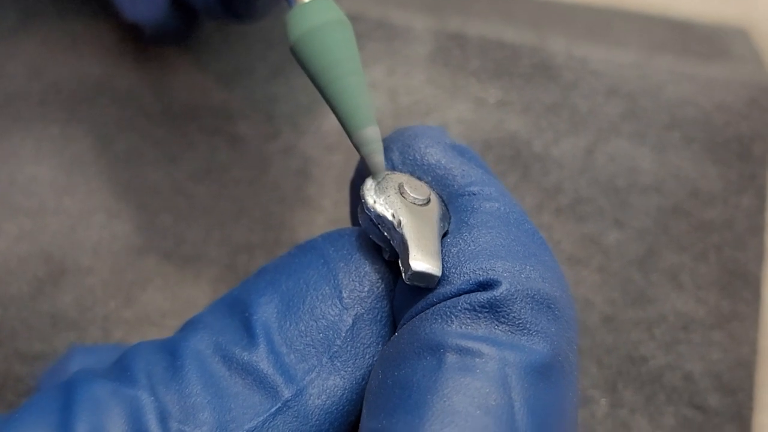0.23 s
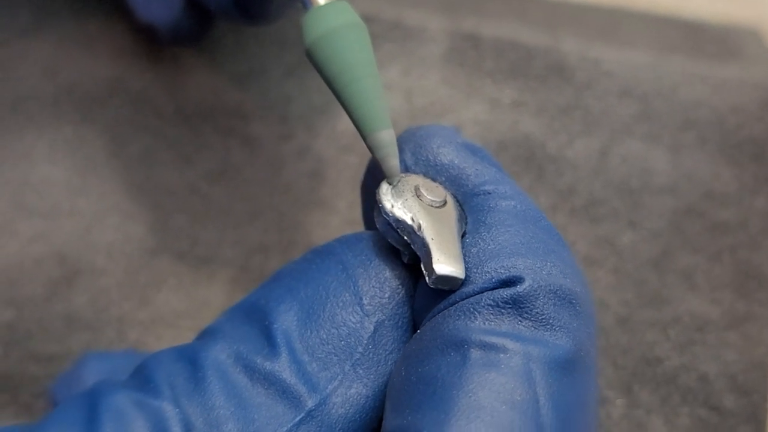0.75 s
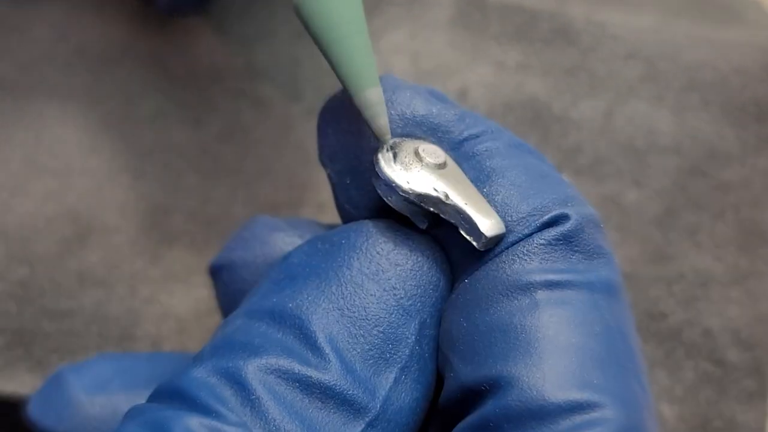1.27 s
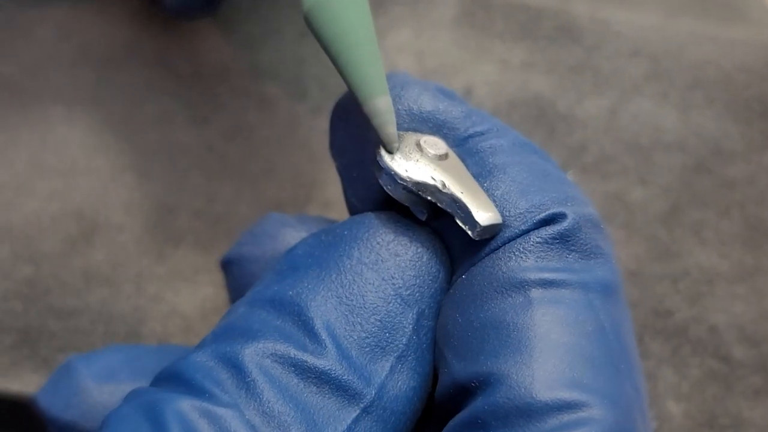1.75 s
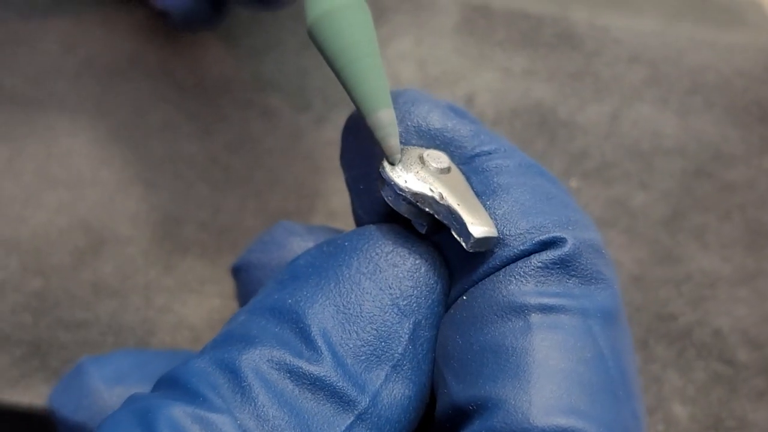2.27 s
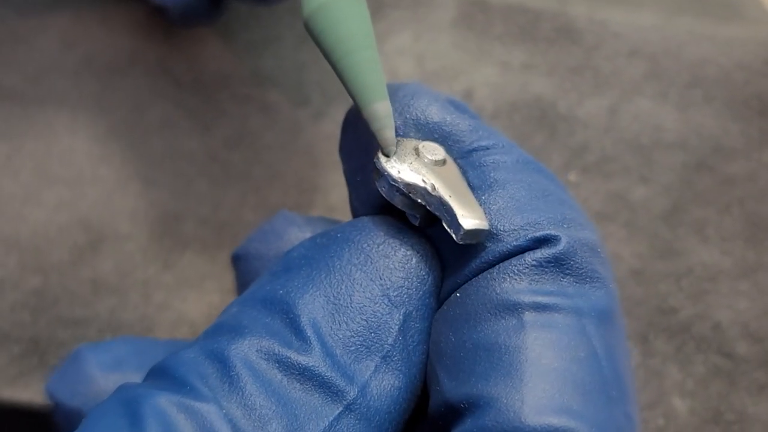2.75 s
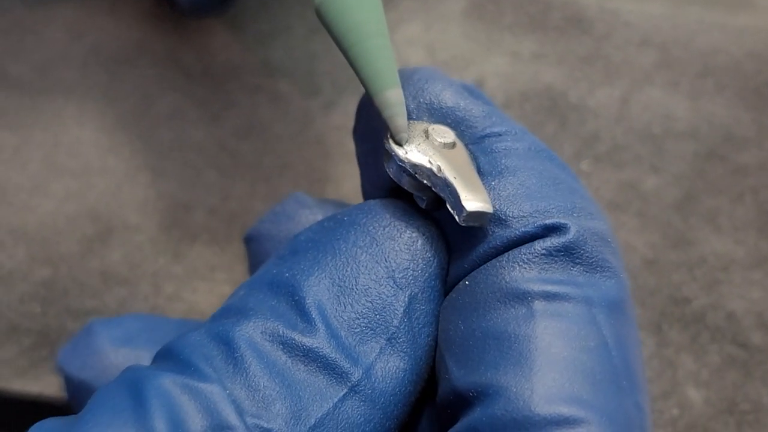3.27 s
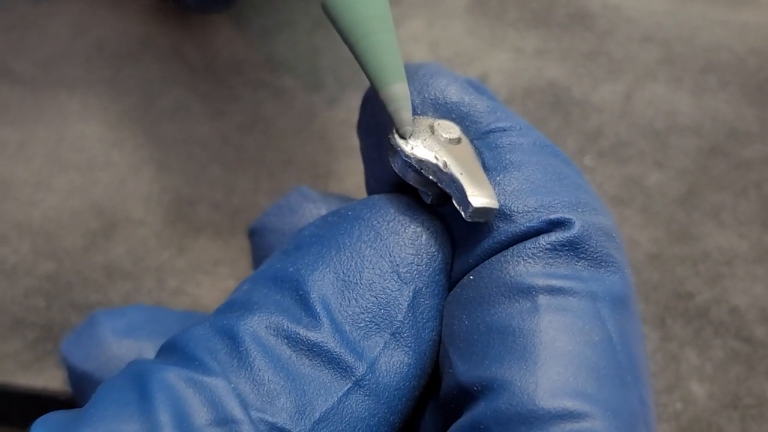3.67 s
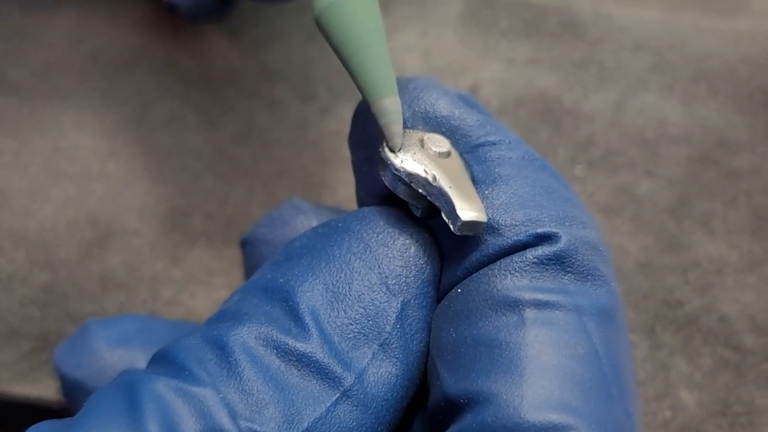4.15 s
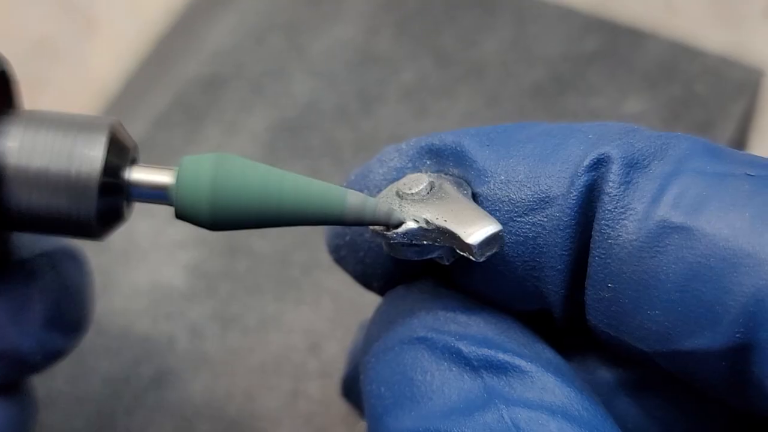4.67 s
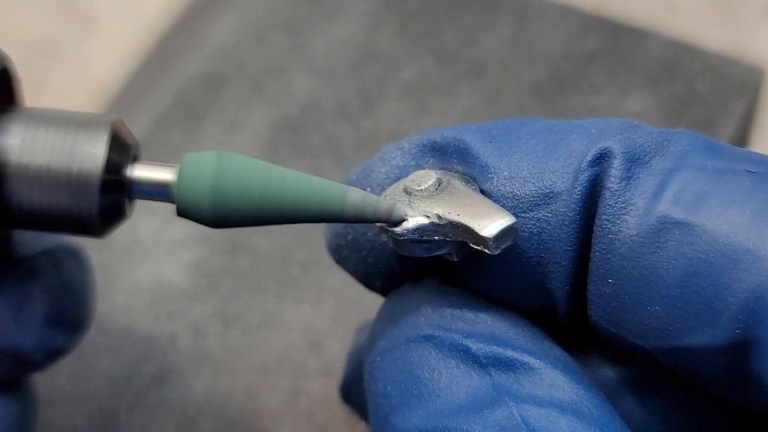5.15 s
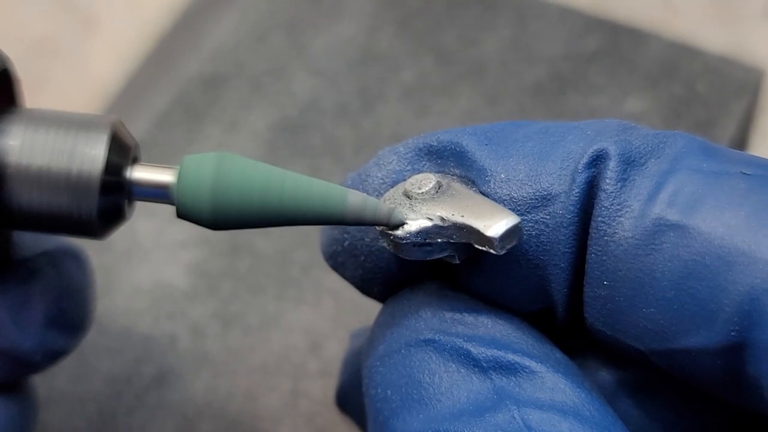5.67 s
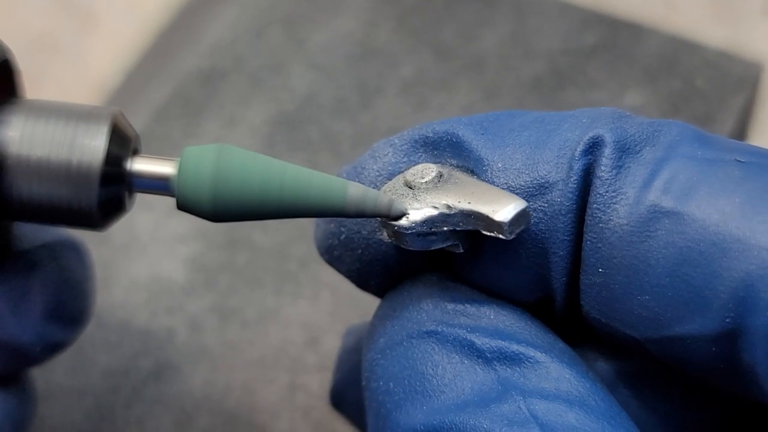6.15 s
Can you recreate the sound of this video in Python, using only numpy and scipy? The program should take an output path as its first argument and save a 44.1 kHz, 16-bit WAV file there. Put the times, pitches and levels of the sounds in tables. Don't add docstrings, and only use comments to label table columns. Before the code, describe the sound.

Close, dry stereo sound of a miniature grinder polishing metal. A rapid rattle forms a bright, nasal, buzzing whine with gritty hiss. After a second the scene jumps to firmer pressure, ringing strongly and slowing under load while its metallic tone slides. Near the end it jumps again to even, slightly wavering grinding. A faint squeal persists and the motor never stops.

```python
import sys
import numpy as np
from scipy import signal
from scipy.fft import rfft, irfft
from scipy.io import wavfile
from scipy.ndimage import uniform_filter1d, map_coordinates

SR = 44100
rng = np.random.default_rng(int(sys.argv[2]) if len(sys.argv) > 2 else 0)


def boost_factor(decibels):
    exponent = np.asarray(decibels, float) / 20
    return 10 ** exponent


def materialize(psi):
    bounded = np.clip(np.atleast_2d(psi).T, -1, 1)
    quanta = np.round(bounded * 32767).astype(np.int16)
    wavfile.write(sys.argv[1], SR, quanta)


N = 283122
ORDERS = 122
STFT = dict(fs=SR, nperseg=1024, noverlap=768)

CUTS_S = [
    1.11,
    4.635,
]
# (frequency [Hz], level [dB])
ROOM_COLOUR = [(20, -16), (100, -12), (160, -12), (200, -2), (400, -4), (500, -12), (900, -30)]
ROOM_DB = -69
# (time [s], frequency [Hz], left [dB], right [dB], left lead [rad])
SQUEAL = [
    (0, 4398, -54, -55, 1.1),
    (1.1, 4399, -54, -57, 1),
    (1.2, 4412, -66, -70, 1.5),
    (1.8, 4418, -54, -60, 1.7),
    (3.7, 4388, -52, -60, 1.8),
    (4.25, 4357, -53, -59, 2),
    (4.6, 4352, -55, -60, 2),
    (4.7, 4358, -52.5, -49.5, 4.2),
    (6.42, 4357, -52.5, -49.5, 4.3),
]
SIDEBANDS_DB = [-3, -5, -4]
# (frequency [Hz], first pass [dB], second [dB], third [dB])
GRIT_COLOUR = [(70, -40, -40, -45), (130, -21, -21, -25), (350, -16, -16, -20), (700, -16, -13, -16),
               (1200, -18, -21, -16), (2000, -17, -21.5, -11), (3500, -14, -16, -13), (7500, -15, -17, -12),
               (9500, -15, -18, -14), (15600, -12, -12, -14)]
# (time [s], speed [turns/s])
SHAFT_SPEED = [
    [(0.0, 143.5), (0.246, 145.2), (0.448, 145.9), (0.946, 146.1), (1.11, 143)],
    [(1.11, 163), (1.37, 164.2), (1.88, 155.2), (2.34, 150.4), (2.82, 148.9), (2.95, 146.8), (3.52, 144.9),
     (3.88, 137.4), (4.25, 132.1), (4.63, 128.5)],
    [(4.635, 132.7), (4.8, 130.5), (5.0, 132.2), (5.38, 134.6), (5.55, 132.7), (5.83, 131.1), (6.0, 132.4),
     (6.25, 131.4), (6.42, 132.2)],
]
# (time [s], pressure [dB], part tilt [dB])
HANDS = [
    [(0.0, -1, -2.5), (0.28, -0.5, 3.5), (0.56, 1.5, 2), (0.83, -0.5, 4), (1.11, -3.5, -3)],
    [(1.11, 2, 21), (1.4, 6.5, 15.5), (1.6, 3.5, 6), (1.85, 5, -4), (2.5, 2, 4), (2.8, 2, 9),
     (3.4, -0.5, 13), (3.95, -3, -2), (4.63, -2, 0.5)],
    [(4.63, 0.5, -4), (5.2, -1, -4), (5.8, -1.1, -5.5), (6.42, -2, -10)],
]
PARTS_HZ = [700, 1300, 2500, 2900, 5000, 6000, 10200, 10800, 16000]
FOLLOWS_PRESSURE = (1, 0.14, 0.2, 0.24)
FOLLOWS_TILT = (-0.16, 0.28, -0.072, -0.062)
# (frequency [Hz], left [dB], right [dB])
ORDER_COLOUR = [
    [(132, -75, -87), (356, -63, -74), (890, -57.5, -61.5), (1710, -45.5, -43.5), (2540, -53.5, -67),
     (4250, -60, -66), (5290, -105, -105), (5740, -63, -89), (6530, -58, -52), (8150, -53, -53),
     (11650, -63.5, -63.5), (15600, -53, -63)],
    [(126, -65.5, -74), (342, -64, -66), (790, -58.5, -68), (1545, -36.5, -36), (2310, -48.5, -60.5),
     (4308, -62, -67.5), (5670, -100, -101), (5730, -72, -88.5), (7126, -64, -46.5), (8590, -48.5, -49.5),
     (12200, -57.5, -68.5), (15600, -53.5, -68)],
    [(127, -63.5, -73), (320, -54.5, -63), (800, -60, -62.5), (1570, -59.5, -64), (2280, -50.5, -52.5),
     (4550, -52, -54), (5930, -63.5, -80), (5540, -57, -46), (6800, -61.5, -71), (9000, -57.5, -73),
     (12300, -57, -66.5), (15600, -61, -66)],
]
# (frequency [Hz], left lead [rad])
PORT_LEAD = [
    [(0, 0.5), (1450, 3.1), (3100, 4.4), (7400, 11.0), (8300, 14.0), (9000, 12.8), (9700, 15.3),
     (15500, 24.0)],
    [(0, 1.55), (3700, 5.3), (4500, 8.2), (8100, 14.4), (9300, 12.7), (9700, 15.6), (12700, 16.9),
     (16000, 24.0)],
    [(0, -0.4), (910, 2.3), (2110, -2.7), (4230, 3.8), (7550, 15.0), (9660, 8.7), (13280, 9.0),
     (15090, 17.7)],
]
STEADINESS = [
    (.25, .45, .6, .3, 0),
    (.12, .35, .34, .3, .25),
    (.25, .3, .5, .38, .5),
]
# [dB], [rad]
SCATTER_DB = [1.8, 1.5, 1.8]
SCATTER_RAD = [1.0, .3, .9]
UNSTEADY_RISE = [.3, .15, .55]
# (time [s], tip chatter [Hz], bearing whine [Hz], gap [Hz], gap level
# [dB])
GRIP = [
    (1.12, 1840, 9000, 10900, 4),
    (1.45, 2080, 8660, 10700, -2),
    (1.85, 2320, 8770, 10000, -3),
    (2.1, 1860, 9360, 10000, 0),
    (2.45, 2000, 9060, 10100, -9),
    (2.9, 2270, 9000, 9940, -6),
    (3.55, 2610, 9370, 9700, -12),
    (4.0, 1860, 9260, 9940, -12),
    (4.63, 1760, 9000, 10250, -10),
]
# (order [-], left [dB], right [dB], left lead [rad])
ODD_FIRST = [(4, 1, 3, -0.6), (7, -7, -6, -1.8), (9, -9, 0, -0.9), (11, -5, -5, 0.1), (12, -10, -6, 0.1),
             (13, 1, 5, 0.3), (14, -11, -8, 2.0), (15, 4, -3, -1.8), (16, 5, 1, -1.4), (18, 0, 7, 0),
             (19, -10, -9, 2.6), (22, -4, -9, 1.2), (23, 4, 4, 0.6), (24, 2, 2, -0.8), (25, 4, 8, 0.5),
             (27, 4, 7, 0.8), (28, -3, -2, 2.3), (56, 7, 0, -0.3), (30, -8, -8, 0), (64, 11, 10, 0.2),
             (67, 9, 11, 0.4), (88, 8, 6, -0.3), (95, 5, 1, -0.9), (105, 6, 3, -2.5), (98, -3, -4, 3),
             (108, 7, 10, 0)]
ODD_MIDDLE = [(1, -7, -7, 0), (2, -2, -2, 0), (4, 3, 3, .1), (5, -7, -3, -2.6), (6, 5, 5, .1),
              (7, 3, 3, .1), (8, 7, 4, 0.4), (9, 1, 2, -0.3), (14, -5, -3, -0.3), (15, 4, 3, -0.2),
              (16, -4, -5, -0.6), (17, -9, -6, -1.3), (18, -5, -2, 1.3), (19, -8, -7, -0.4),
              (26, -4, -4, -0.1)]
ODD_LAST = [(2, -10, -10, .1), (3, -9, -9, .1), (5, -13, -14, -0.2), (6, 8, 7, -0.5), (8, -10, -12, 0.8),
            (10, -3, -6, -1.4), (11, 5, 6, 2.3), (12, -4, -6, -1.2), (13, 8, 4, 1.4), (14, -5, -4, 1.5),
            (15, 5, 6, -0.4), (18, -5, -5, 0), (19, -6, -8, 0.3), (21, 4, 4, 0.5), (26, -7, -7, 1.0),
            (27, 6, 3, -0.4), (29, -8, -18, 0), (30, -9, -9, 0), (31, 4, 2, 0), (33, -16, -16, 0),
            (34, -3, -4, 0), (52, 4, 5, -0.1), (74, 7, 5, -0.4), (77, 4, 7, -0.3), (79, 6, 2, 1.2),
            (96, 6, 2, -1.0), (114, 6, 6, 0)]
# (centre [Hz], width [Hz], left [dB], right [dB])
BODY_FIRST = [(910, 210, -5.5, -6), (3070, 210, -4, 10.5), (3490, 270, 8.5, 4), (4550, 190, 11, -7),
              (6490, 310, -46, -13), (7560, 340, -8.5, -15), (8460, 900, -4.5, -28), (10010, 120, 6, 13),
              (10810, 180, 4, 9), (12600, 470, 1, -27), (13150, 130, 0, -7), (13240, 370, -8, -5),
              (9427, 53, -4, 17)]
BODY_MIDDLE = [(897, 30, -9, -31), (1170, 128, -33.5, -13.5), (1547, 185, -12, -9.5),
               (3120, 228, -8.5, 4.5), (3342, 73, 12, -42), (3596, 33.6, 10.5, 21.5),
               (5000, 426, 16.5, 12.5), (7426, 510, -8.5, -13.5), (8250, 580, -3.5, -47),
               (8930, 440, -9.5, -8), (9650, 290, -17, 1.5), (13240, 1050, -9, 4.5)]
BODY_LAST = [(3134, 380, -10.5, -18), (4840, 1130, -10, 1), (5290, 190, -47, -18), (7050, 58, 3, 17),
             (7860, 400, -8.5, 15), (8300, 400, -4, -25), (9700, 230, -4, 16.5), (10900, 87, -1, 10),
             (11600, 640, -5, 9.5), (13030, 170, -8, 1), (14200, 330, -1, 2)]
# (order [-], time [s], length [s], left [dB], right [dB])
BLOOM_FIRST = [(7, 0.47, 0.87, -11, -6), (8, 0.34, 1.6, -21, -8.5), (10, 0.15, 0.32, 2, -1),
               (12, 0.76, 0.35, -8, -15), (17, 0.2, 0.15, 12, 12), (60, 0.6, 4, 5, 7), (62, 0.6, 4, -1, 5),
               (45, 0.53, 3, 11, 9), (46, 0.67, 3, 15, -5), (48, 0.55, 3, -9, -6), (56, 0.53, 1.8, -2, 5),
               (68, 0.21, 4.1, -3, 3), (69.6, 0.37, 0.72, -13, -13), (70, 0.05, 3, -15, -15),
               (69.5, 1.1, 3, 10, 4), (74, 0.55, 4, -7, -10), (86, 0.6, 1.6, 6, 11), (88.2, 1.02, 3, 5, 22),
               (104.6, 0.05, 3, -8, -5), (107, 0.67, 0.6, -12, -7)]
BLOOM_MIDDLE = [(3, 1.38, 1.2, 11.5, 10.5), (4, 4.5, 2, -10, -3), (6, 2.4, 3.4, -16, -5),
                (7, 3, 3.1, -16, -12.5), (8, 2.12, 1.1, -15, -12), (8, 4.6, 1.2, -10, -15),
                (9, 1.77, 0.53, -12, -21), (9, 3.38, 1.3, -13, -6.5), (10, 1.77, 0.64, -11, -5),
                (10, 3.42, 0.65, 7, 6), (11, 1.25, 0.3, -13, -17), (12, 1.66, 0.44, 7.5, 8.5),
                (12, 3.6, 6, -9, -4.5), (13, 0.75, 0.41, -6, -12), (13, 1.9, 3.9, -20, -1),
                (13, 3.26, 0.97, 8.5, 8), (14, 2.63, 2.3, -21, -1), (15, 1.2, 0.22, -23, -2),
                (15, 1.97, 0.21, -11, -16), (15, 3.97, 2.9, -8.5, -4.5), (16, 4.09, 1.2, -7, -4),
                (20, 4.6, 2.3, -16, -7),
                (50, 2.7, 3.2, 11.5, -8), (65.5, 3.1, 1, 14, 7), (67.1, 3.11, 0.64, 13, 5),
                     (64.4, 2.5, 1.2, -17, -13), (66, 4, 0.96, -11, -6), (70, 2.3, 0.81, -14, -7),
                     (60, 1.23, 0.7, 13, 7.5), (85.6, 1.4, 0.7, 14, 2), (52, 4.24, 2, 13.5, 10.5),
                     (53, 0.95, 0.9, 17, 11), (55, 2.15, 0.66, 5, 10), (58, 2.48, 1.04, 13, 14),
                     (62, 2.7, 0.65, -4, 9), (65.7, 2.48, 0.84, 3, 8.5), (65, 1.7, 0.9, -17, 1),
                     (65.55, 3.39, 0.71, 9.5, 3), (67.6, 3.36, 0.35, 17, 14), (71, 1.4, 1.6, -7, -16),
                     (68.6, 1.4, 1.2, -15, 2), (73, 8.8, 3.5, -33, 2), (73.3, 3.2, 3, -16, -9),
                     (85, 3.5, 3.9, -4, -19), (98, 2.0, 0.9, 9, 14), (101, 2.62, 0.71, -12, 17),
                     (104.6, 2.67, 0.6, 13, 14)]
BLOOM_LAST = [(16, 4.7, 3.3, -8, 5), (20, 5.34, 0.4, 2, 6), (24, 5.65, 2.7, -26, 15), (73, 5.7, 4, -11, -3),
              (46, 3.6, 2.99, 11, -6), (50, 5.84, 0.74, 4, 3), (52, 5.735, 0.92, 7.5, 9),
              (55, 5.6, 1.2, -1, 10), (57, 5.51, 2.5, -15, -13), (58, 5.4, 2.2, 9, -12), (59, 7, 3, 3, -14),
              (60, 3.7, 3, -1, -12), (61, 3.7, 3, -13, -10), (74, 6.5, 3.8, -1.5, -10),
              (77, 12, 2.3, -5, -8), (77, 5.5, 2.5, -24, 12.5), (92, 6.14, 3.8, -7, 0),
              (96, 5.37, 0.71, 10, 1), (96.8, 3.1, 3, -8, 6), (105, 5.65, 3, -7, -5),
              (106, 5.31, 3, -1, -9)]
# (order [-], time [s], length [s], left lead [rad])
SWINGS = [(3, .05, 4, 2.5), (18, 1.07, 4, 2), (56, .05, 4, 3), (64, 1.07, 4, -2), (74, .7, 1.2, -2.5),
          (75, .55, 4, 3), (89, .55, 4, -2.3), (3, 2.83, 4, 1.5), (4, 3.3, 1.2, -1.5), (6, 3.02, 4, -2.5),
          (7, 3.3, 2, -2.5), (9, 3.2, 2, -1), (13, 1.63, 1.2, 2), (14, 1.53, 4, 3), (15, 3.11, .4, -3),
          (15, 4.04, 1.2, 2.5), (16, 1.35, 1.2, 2), (16, 4.5, 2, -3), (43, 1.72, 2, -2.5),
          (49, 2.83, 2, -3), (51, 3.3, 2, -3), (52, 2.28, 4, -3), (70, 3.11, 2, -3), (28, 4.77, 4, -1.5),
          (52, 5.24, 4, -2), (53, 5.98, 4, -2.5), (65, 5.14, 4, 3), (71, 5.14, 4, 3), (77, 5.33, .7, 3),
          (79, 5.42, 2, 2.5), (95, 5.51, 2, 2.5)]


def read(points, hz):
    f, *columns = np.transpose(points)
    return np.array([np.interp(np.log(hz + 1), np.log(f + 1), c) for c in columns])


def drift(shape, size):
    x = rng.standard_normal(shape)
    for _ in range(2):
        x = uniform_filter1d(x, size, axis=0)
    return x / np.sqrt(np.mean(x ** 2))


def room():
    a, b = rfft(rng.standard_normal((2, N)))
    ports = np.array([1.3 * (a + .3 * b), .8 * (a - .3 * b)])
    hum = irfft(ports * boost_factor(read(ROOM_COLOUR, np.fft.rfftfreq(N, 1 / SR))), N)
    return boost_factor(ROOM_DB) * hum / np.std(hum.mean(0))


def squeal():
    s, hz, *port_db, lead_rad = np.transpose(SQUEAL)
    t = np.arange(N) / SR
    wavering_hz = np.interp(t, s, hz) + 1.61 * drift(N, size=900)
    angle = 2 * np.pi * np.cumsum(wavering_hz) / SR
    level_db = np.array([np.interp(t, s, p) for p in port_db]) + .8 * drift(N, size=2000)
    angle = angle + np.interp(t, s, lead_rad) * [[1], [0]]
    shaft = 2 * np.pi * np.cumsum(np.interp(t, *np.concatenate(SHAFT_SPEED).T)) / SR
    sides = 0
    for lower, db in enumerate(SIDEBANDS_DB, start=1):
        sides = sides + boost_factor(db + 2 * drift(N, size=2000)) * np.cos(angle - lower * shaft)
    return np.sqrt(2) * boost_factor(level_db) * (np.cos(angle) + sides * (t < CUTS_S[1]))


def grit(turns, throb):
    hiss = rng.standard_normal((2, len(turns))) * np.sqrt(SR / 64)
    return hiss * (1 + throb * np.cos(2 * np.pi * turns))


def blooms(table, turn_s):
    swell_db, lead_rad = np.zeros((2, 2, len(turn_s), ORDERS))

    def passing(s, length_s):
        return np.exp(-(2 * (turn_s - s) / length_s) ** 2)

    for order, s, length_s, *port_db in table:
        swell_db[:, :, round(order) - 1] += np.outer(port_db, passing(s, length_s))
    for order, s, length_s, swing_rad in SWINGS:
        if turn_s[0] < s < turn_s[-1]:
            lead_rad[0, :, round(order) - 1] += swing_rad * passing(s, length_s)
    return boost_factor(swell_db) * np.exp(1j * lead_rad)


def rattle(turns, swell, odd, scatter_db, scatter_rad, rise, smear, wear, flutter, apart):
    rows, steps = int(turns[-1]) + 2, 4096
    delay = np.cumsum(smear * rng.standard_normal(ORDERS))
    start = np.exp(2j * np.pi * np.cumsum(delay)) * np.ones((2, 1))
    luck = rng.standard_normal((4, ORDERS)) * (np.arange(ORDERS) >= 30)
    start *= boost_factor(scatter_db * (luck[0] + 0.47 * luck[1:3]))
    start *= np.exp(1j * scatter_rad * luck[3] * [[1], [0]])
    order, left_db, right_db, lead_rad = np.transpose(odd)
    odd_gain = boost_factor(np.array([left_db, right_db])) * np.exp(1j * np.array([lead_rad, 0 * lead_rad]))
    start[:, order.round().astype(int) - 1] *= odd_gain

    growth = (np.arange(1, ORDERS + 1) / ORDERS) ** rise

    def twist(size):
        return growth * (drift((rows, ORDERS), size) + 1j * drift((rows, ORDERS), size))

    shared = wear * twist(size=24) + flutter * twist(size=3)
    out = []
    for port in range(2):
        change = 1 + shared + apart * twist(size=8)
        change /= np.sqrt(np.mean(abs(change) ** 2, axis=0))
        orders = np.zeros((rows, steps // 2 + 1), complex)
        orders[:, 1:ORDERS + 1] = start[port] * swell[port] * change
        shape = irfft(orders, steps) * steps / np.sqrt(2)
        out.append(map_coordinates(shape, [turns, turns % 1 * steps], order=1, mode="wrap"))
    return np.array(out)


def tool(k, first, last):
    t = np.arange(first, last) / SR
    hz = np.interp(t, *np.transpose(SHAFT_SPEED[k])) * (1 + 0.00056 * drift(len(t), size=1500))
    turns = np.cumsum(hz) / SR
    odd = [ODD_FIRST, ODD_MIDDLE, ODD_LAST][k]
    body = [BODY_FIRST, BODY_MIDDLE, BODY_LAST][k]
    bloom = [BLOOM_FIRST, BLOOM_MIDDLE, BLOOM_LAST][k]
    *repeat, grit_likeness = STEADINESS[k]

    swell = blooms(bloom, np.interp(np.arange(int(turns[-1]) + 2), turns, t))
    blows = rattle(turns, swell, odd, SCATTER_DB[k], SCATTER_RAD[k], UNSTEADY_RISE[k], *repeat)
    f, s, lines = signal.stft(blows, **STFT)
    hiss = signal.stft(grit(turns, throb=.35), **STFT)[2]
    same = np.clip(np.interp(f, [1900, 3200], [.97, grit_likeness]), 0, 1)[:, None]
    hiss[1] = same * hiss[0] + np.sqrt(1 - same ** 2) * hiss[1]

    peaks_db = 0
    for centre_hz, width_hz, *db in body:
        peaks_db = peaks_db + np.outer(db, np.exp(-((f - centre_hz) / width_hz) ** 2))
    hiss *= boost_factor(read(GRIT_COLOUR, f)[k] - .4 * peaks_db)[..., None]

    when_s, push_db, tilt_db = np.transpose(HANDS[k])
    now_s = s + t[0]
    hands_db = np.outer(FOLLOWS_PRESSURE, np.interp(now_s, when_s, push_db))
    hands_db += np.outer(FOLLOWS_TILT, np.interp(now_s, when_s, tilt_db))
    share = np.array([np.interp(f, PARTS_HZ, np.append(0, row.repeat(2))) for row in np.eye(4)])
    colour_db = read(ORDER_COLOUR[k], f) + peaks_db
    z = (lines + hiss) * boost_factor(colour_db[..., None] + share.T @ hands_db)

    if k == 1:
        when_s, chatter_hz, whine_hz, gap_hz, gap_db = np.transpose(GRIP)

        def bump(centre_hz, width_hz):
            return np.exp(-((f[:, None] - np.interp(now_s, when_s, centre_hz)) / width_hz) ** 2)

        grip_db = 4.5 * bump(chatter_hz, 220) + 7.8 * bump(whine_hz, 314)
        grip_db += np.interp(now_s, when_s, gap_db) * bump(gap_hz, 290)
        z *= boost_factor(grip_db)
    z[0] *= np.exp(1j * np.interp(f, *np.transpose(PORT_LEAD[k])))[:, None]
    return signal.istft(z, **STFT)[1][:, :len(t)]


def scene():
    out, fade = room() + squeal(), 600
    cuts = [-fade] + [round(s * SR) for s in CUTS_S] + [N + fade]
    for k in range(3):
        first, last = max(cuts[k] - fade, 0), min(cuts[k + 1] + fade, N)
        n = np.arange(first, last)
        inside = np.minimum(n - cuts[k], cuts[k + 1] - n) / (2 * fade) + .5
        out[:, first:last] += tool(k, first, last) * np.sin(np.pi / 2 * np.clip(inside, 0, 1))
    return out


def low_pass(x):
    return signal.sosfilt(signal.butter(12, 16960, fs=SR, output="sos"), x)


def record(dry):
    edge = signal.firwin(511, 15700, window=("kaiser", 9), fs=SR)
    mix = signal.oaconvolve(dry, edge[None], "same")
    return low_pass(mix)


dry = scene()
out = record(dry)
materialize(out)
```